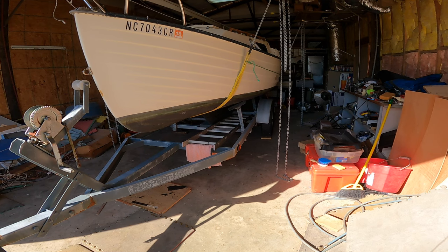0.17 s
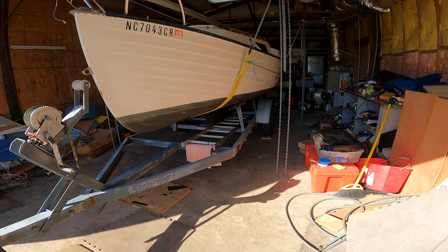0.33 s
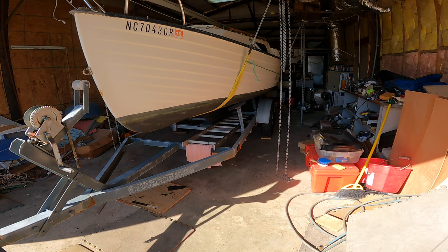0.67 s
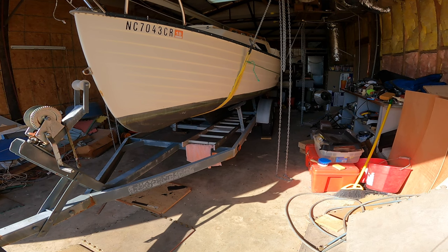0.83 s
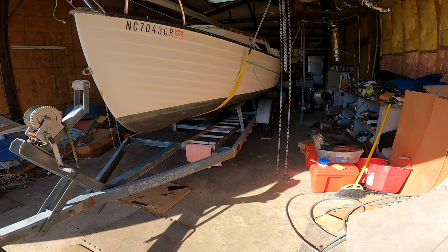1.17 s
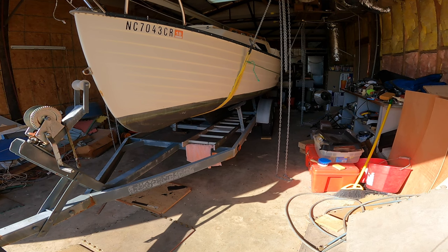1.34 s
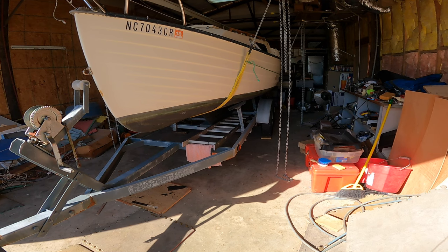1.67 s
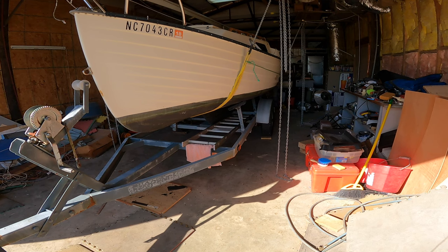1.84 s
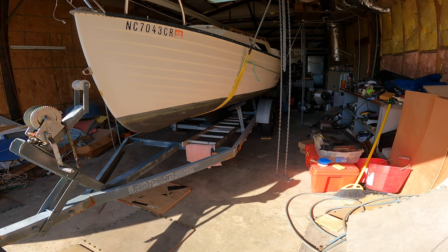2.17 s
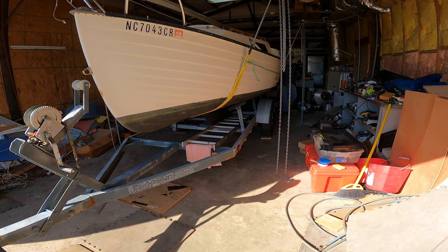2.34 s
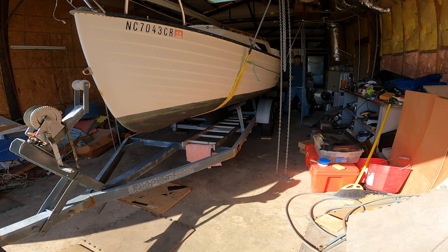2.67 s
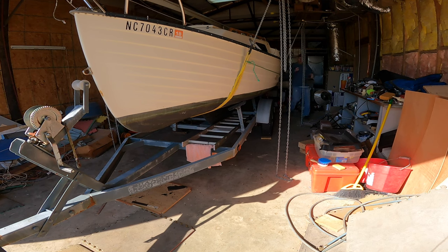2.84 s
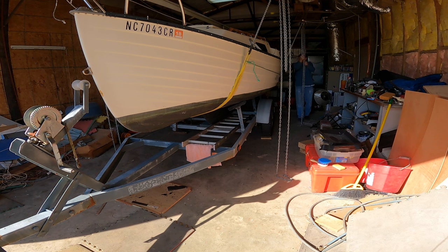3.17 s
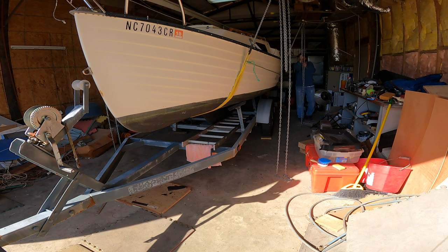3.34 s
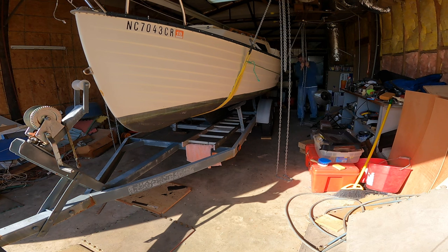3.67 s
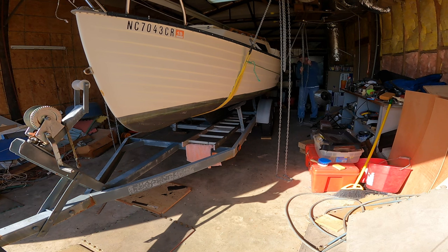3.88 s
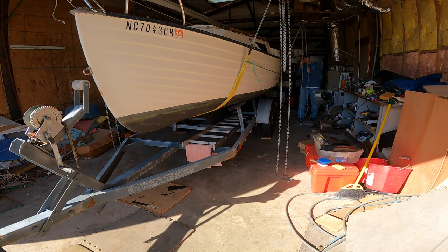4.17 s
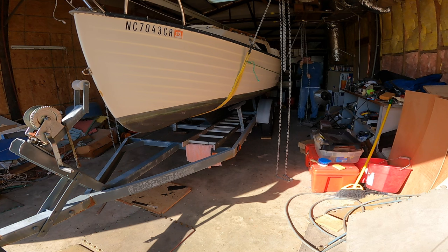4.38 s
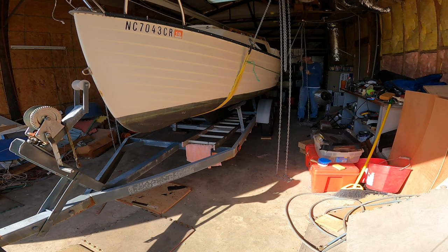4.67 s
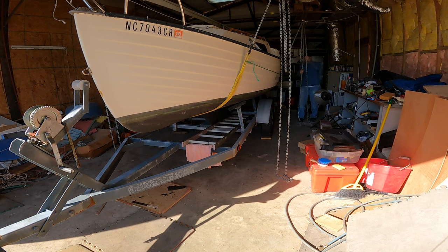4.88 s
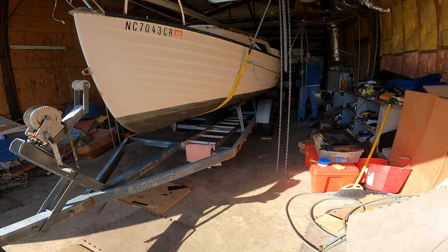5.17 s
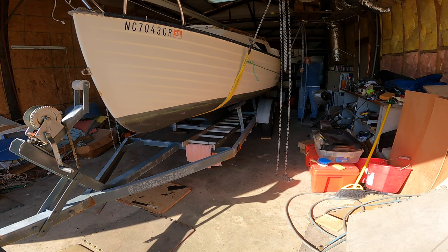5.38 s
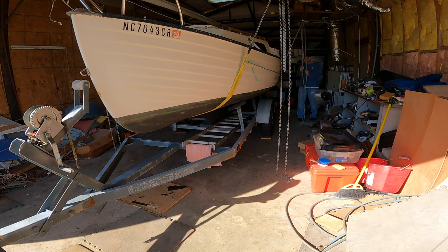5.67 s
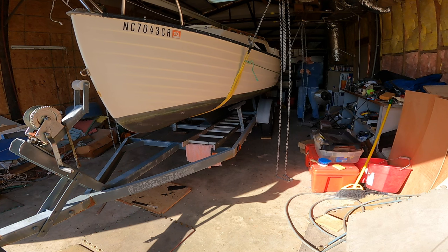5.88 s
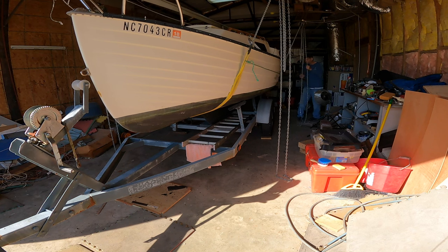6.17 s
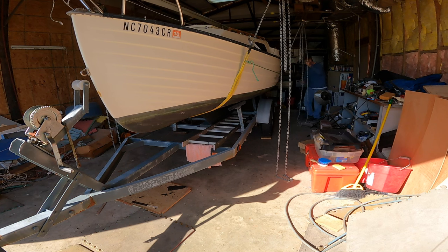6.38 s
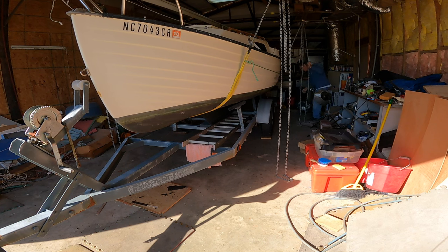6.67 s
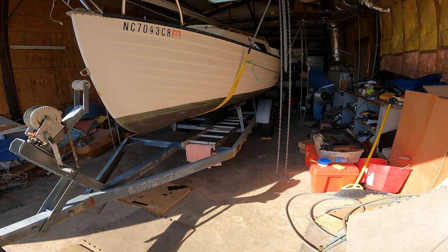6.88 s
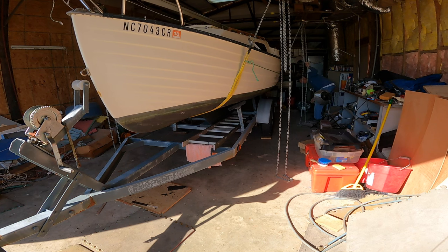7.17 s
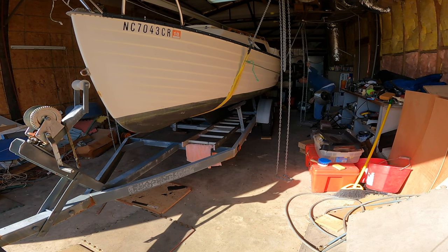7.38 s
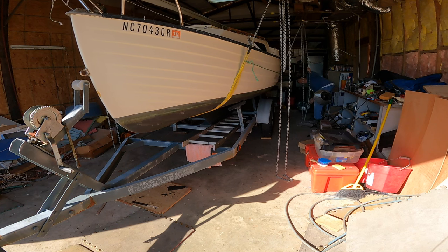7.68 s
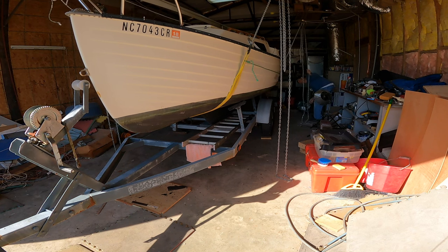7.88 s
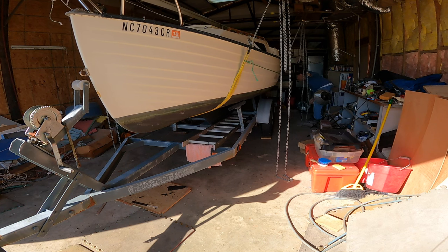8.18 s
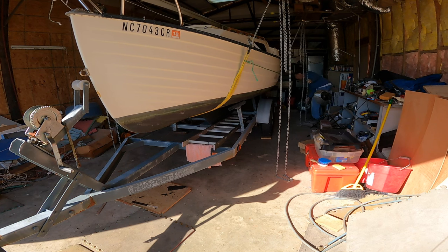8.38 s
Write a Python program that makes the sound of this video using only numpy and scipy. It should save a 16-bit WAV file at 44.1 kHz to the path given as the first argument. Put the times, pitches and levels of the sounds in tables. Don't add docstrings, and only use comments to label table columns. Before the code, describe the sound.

A fixed microphone hears a mostly quiet shed: distant motor hum, low air and faint traffic. Scattered gritty footsteps and a small clink come first. Then a chain hoist at the far end clatters in bursts, bright ratchet clicks over hollow metal knocks, with pawl clacks and dull low wooden booms after them. A pause of scuffs and dull wooden taps leads to a final brief rattle and a few last clicks.

```python
import sys
import numpy as np
from scipy import signal
from scipy.fft import rfft, irfft, next_fast_len
from scipy.io import wavfile
from scipy.ndimage import uniform_filter1d

SR = 44100
rng = np.random.default_rng(int(sys.argv[2]) if len(sys.argv) > 2 else 0)


def unload_audio(sound):
    columns = np.transpose(np.atleast_2d(sound))
    steps = np.round(np.clip(columns, -1, 1) * 32767)
    wavfile.write(sys.argv[1], SR, steps.astype(np.int16))


def magnitude_from_level(level_db):
    exponent = np.asarray(level_db, float) / 20
    return 10 ** exponent


N = 375732
TIME = np.arange(N) / SR

# (frequency [Hz], side minus mid [dB])
SHED_SIDE = [(100, -24), (260, -13.5), (500, -9.5), (1500, -6), (2500, -3), (5000, -5), (8000, -6.5),
             (12000, -22.5)]


def unit(x):
    return x / np.sqrt(np.mean(x ** 2))


def colour(x, points):
    hz, db = np.transpose(points)
    size = next_fast_len(len(x))
    bins_hz = np.arange(size // 2 + 1) * SR / size
    gain = magnitude_from_level(np.interp(np.log(bins_hz + 1), np.log(hz), db))
    return irfft(rfft(x, size) * gain, size)[:len(x)]


def ring(x, modes):
    out = 0
    for hz, width, db in modes:
        pole = np.exp((2j * np.pi * hz - np.pi * width) / SR)
        out = out + magnitude_from_level(db) * (1 - abs(pole)) * signal.lfilter([1], [1, -pole], x).imag
    return out


def band(x, low_hz, high_hz):
    return signal.sosfilt(signal.butter(2, [low_hz, high_hz], "band", fs=SR, output="sos"), x)


def smear(blows, length_s):
    return signal.lfilter([1], [1, -np.exp(-1 / (length_s * SR))], blows)


def walk(rate):
    k = int(SR / rate)
    held = np.repeat(rng.standard_normal(N // k + 1), k)
    return unit(uniform_filter1d(uniform_filter1d(held, k), k)[:N])


def place(out, s, sound):
    start = int(s * SR)
    room = out[..., start:start + sound.shape[-1]]
    room += sound[..., :room.shape[-1]]


def gains(tables, edge_s, shares):
    out = 0
    for table, share in zip(tables, shares):
        s, db = np.transpose(table)
        gate = np.clip(np.minimum(TIME - s[0], s[-1] - TIME) / edge_s, 0, 1)
        out = out + gate * magnitude_from_level(np.interp(TIME, s, db)) * magnitude_from_level(np.array([0, *share]))[:, None]
    return out


def swells(rows):
    roundness = 1.56
    coarse, power = TIME[::64], 0
    for s, db, rise, fall, *tied in rows:
        away = np.maximum((s - coarse) / max(rise, .005), (coarse - s) / max(fall, .005))
        level_db = db - 20 * away ** roundness + np.array([0, *tied])[:, None]
        power = power + magnitude_from_level(level_db) ** 2
    return np.array([np.interp(TIME, coarse, np.sqrt(p)) for p in power])


def clicks(rate, scatter_db, length_s):
    strength = magnitude_from_level(scatter_db * np.clip(rng.standard_normal(N), -2, 2))
    struck = (rng.random(N) < rate / SR) * strength
    return unit(smear(struck, length_s) * rng.standard_normal(N))


def hoist():
    # (time [s], link rattle [dB])
    pulls = [
        [(3.64, -23.5), (3.648, -25.5), (3.666, -34), (3.694, -22.5), (3.814, -22.5), (3.892, -27),
         (3.96, -75.5)],
        [(4.0, -61), (4.018, -29), (4.23, -24.5), (4.31, -27), (4.478, -25.5), (4.534, -30.5), (4.6, -62)],
        [(5.29, -30.5), (5.448, -23), (5.732, -24), (5.814, -34.5), (5.87, -54.5)],
        [(7.61, -41), (7.616, -26.5), (7.734, -26.5), (7.742, -22.5), (7.894, -29), (7.942, -62), (8.0, -43)],
    ]
    # (housing [dB], timber [dB], top [dB])
    pull_shakes = [(-8.5, -8.5, -35), (-4, -13, 2), (-5, -16, 1.5), (-4, -12.5, 1)]
    # (frequency [Hz], width [Hz], level [dB])
    link_rings = [(1980, 110, -5.5), (2247, 70, -3.5), (2347, 100, -1.5), (2777, 34, -2), (3073, 45, 2),
                  (3330, 60, -0.5), (3495, 49, 3.5), (3697, 70, 4), (4140, 63, 1), (4450, 57, 3.5),
                  (4640, 70, 1), (5100, 65, 2.5), (5960, 160, -0.5), (6700, 150, 0.5)]
    # (time [s], peak [dB], housing minus peak [dB], timber minus peak [dB], own ring [Hz])
    pawl_blows = [(3.6429, -14, -22.5, -39, 4060), (3.699, -15, -34, -13.5, 4600),
                  (4.0008, -20, -17, -44, 5440), (4.0178, -30.5, -3.5, -41, 3840),
                  (4.6098, -20.5, -7.5, -6.5, 4700), (4.975, -29.5, -17.5, -14, 3460),
                  (5.1629, -36, -11.5, -0.5, 4430), (5.2887, -14.5, -22.5, -31, 3340),
                  (5.362, -20.5, -8, -8.5, 3300), (5.9417, -19, -8.5, -11.5, 4700),
                  (5.957, -21, -24, -12, 2330), (7.6117, -18.5, -21, -37, 3240),
                  (7.625, -16.5, -33, -51, 3460), (7.661, -32, -0.5, -7, 4450), (8.064, -23, -7, -13, 4240),
                  (8.0755, -41.5, 2.5, 1.5, 2220), (8.235, -39, -9, -3.5, 4680)]

    pull = gains(pulls, 0.0027, pull_shakes)
    drive = pull[:3] * clicks(700, 1.8, 0.0033) * magnitude_from_level(np.array([[-4.], [-2.5], [-2.5]]))
    drive[1] *= magnitude_from_level(3.87 * walk(40) - 8.0)
    drive[1] += magnitude_from_level(-6.5) * band(drive[1], 694, 720) + magnitude_from_level(4.0) * band(drive[1], 1304, 1500)

    links = sum(ring(clicks(210, 2.2, .0015), [mode]) for mode in link_rings)
    jingle = unit(links) * pull[0] * magnitude_from_level(-3.5)
    jingle += unit(band(clicks(600, 6.3, 0.0074), 5500, 9300)) * pull[3] * magnitude_from_level(-5.0)
    jingle += ratchet()
    jingle += magnitude_from_level(-0.5) * band(drive[1], 320, 1850)

    age = np.arange(4096) / SR
    noises = rng.standard_normal((len(pawl_blows), 4096))
    for (s, db, housing_db, timber_db, hz), noise in zip(pawl_blows, noises):
        blow = noise * np.exp(-age / 0.0071)
        centred = magnitude_from_level(1.5) * blow + magnitude_from_level(1.0) * band(blow, 1200, 1900)
        levels = magnitude_from_level(db - 6.5 + np.array([0, housing_db + 5.5, timber_db + 13.0]))
        place(drive, s, levels[:, None] * np.array([blow, centred, blow]))
        dull_crack = magnitude_from_level(db + housing_db + 6.5) * band(blow, 280, 1600)
        first_click = magnitude_from_level(db - 15) * band(noise * np.exp(-age / .0012), 1500, 9000)
        knot = unit(band(noise, hz / 1.04, hz * 1.04)) * np.exp(-age / 0.011)
        own_ring = 0.67 * magnitude_from_level(db - 14 + 0.5 * (-22.0 - db)) * knot
        place(jingle, s, dull_crack + first_click + own_ring)
    return steel(drive), jingle


def steel(drive):
    # (frequency [Hz], density [dB per Hz])
    clack = [(820, -60), (1400, -4.5), (1990, -4.5), (2930, -1.5), (4750, 2), (5440, -1.5), (10200, -11.5),
             (12000, -23.5), (15600, -53.5), (22000, -120)]
    # (frequency [Hz], width [Hz], level [dB])
    housing = [(640, 60, -11), (694, 55, -3), (1200, 70, -11), (1269, 42, 0), (1380, 80, -8),
               (1950, 110, -11), (2225, 70, -8), (2780, 40, -7), (3070, 40, -8)]
    # (frequency [Hz], width [Hz], level [dB])
    timber = [(192, 120, -2.5), (257.4, 190, -9.5), (297, 26, 4.5), (318.5, 25, 6), (360, 37, -9.5),
              (450, 61, -16.5)]
    blow = np.zeros(SR // 2)
    blow[SR // 4] = 1
    out = 0
    for shape, points, push in zip((colour, ring, ring), (clack, housing, timber), drive):
        out = out + shape(push, points) / np.linalg.norm(shape(blow, points))
    return out


def ratchet():
    # (time [s], peak [dB])
    teeth = [
        [(3.6444, -36), (3.6763, -28), (3.6972, -17), (3.7372, -13), (3.7741, -13), (3.8145, -24.5),
         (3.8549, -26.5), (3.8758, -38)],
        [(4.0178, -14.5), (4.0487, -17), (4.0782, -14), (4.1051, -16), (4.1296, -13.5), (4.1779, -17),
         (4.2014, -16), (4.2962, -14.5), (4.3246, -15), (4.3516, -13.5), (4.3785, -20), (4.4084, -13),
         (4.4359, -20), (4.4593, -12.5), (4.4833, -18), (4.5177, -17)],
        [(5.3333, -13), (5.3607, -15.5), (5.4076, -23), (5.4625, -12.5), (5.4799, -17), (5.5119, -21.5),
         (5.6096, -12), (5.6855, -20), (5.7049, -20.5), (5.7738, -13.5)],
        [(7.6104, -28), (7.6582, -12.5), (7.6847, -14.5), (7.7136, -15.5), (7.7376, -14.5), (7.7615, -17),
         (7.8144, -15.5), (7.8443, -18.5), (7.8847, -14)],
    ]
    # (frequency [Hz], width [Hz], level [dB])
    tooth_rings = [(6960, 36, 4), (7350, 240, 5.5), (8700, 340, -7.5), (10200, 1300, -5.5)]
    blows = np.zeros(N)
    for run, offset_db in zip(teeth, (-18.5, -7, -8, -5.5)):
        s, db = np.transpose(run)
        blows[(s * SR).astype(int)] = magnitude_from_level(db + offset_db)
    crunch = smear(blows, 0.0059) * rng.standard_normal(N)
    unit_gain = np.std(ring(rng.standard_normal(SR), tooth_rings))
    return ring(crunch, tooth_rings) / unit_gain + magnitude_from_level(-7.5) * band(crunch, 3000, 8500)


def knocks():
    # (time [s], peak [dB])
    low_knocks = [(3.645, -36), (3.689, -45), (3.726, -27), (3.755, -27.5), (3.785, -28.5), (3.826, -42),
                  (3.872, -30), (4.026, -36), (4.069, -58), (4.135, -30.5), (4.186, -42), (4.247, -53),
                  (4.31, -29), (4.358, -30), (4.392, -27.5), (4.422, -45), (4.476, -33), (4.614, -39),
                  (4.641, -43), (5.168, -40), (5.299, -28), (5.364, -24), (5.44, -20.5), (5.506, -35.5),
                  (5.565, -27), (5.622, -19), (5.692, -28), (5.741, -45), (5.774, -35), (5.881, -43),
                  (5.956, -45), (7.612, -36), (7.661, -43), (7.697, -23), (7.761, -30), (7.827, -36),
                  (7.867, -37), (7.988, -48), (8.073, -33)]
    # (time [s], peak [dB])
    high_knocks = [(3.664, -29), (3.6964, -19), (3.7599, -47), (3.8272, -19), (3.86, -41), (4.04, -29),
                   (4.096, -39.5), (4.134, -26.5), (4.1807, -35), (4.2087, -45.5), (4.27, -29),
                   (4.3205, -29), (4.38, -25), (4.405, -31), (4.4362, -37.5), (4.467, -38.5), (4.522, -34),
                   (5.3088, -41.5), (5.3438, -42.5), (5.378, -32.5), (5.4294, -31.5), (5.4641, -26),
                   (5.499, -29), (5.5426, -23), (5.5657, -25), (5.6083, -25), (5.6294, -42.5),
                   (5.695, -39.5), (5.7744, -43), (7.661, -29), (7.681, -21), (7.7113, -31), (7.737, -27),
                   (7.797, -28), (7.8494, -47), (7.9129, -47), (7.9914, -36)]
    # (frequency [Hz], rise [s], decay [s], gain [dB])
    knock_tones = [(696, .004, .019, -3), (1269, .005, .024, -4.5)]
    # (time [s], peak [dB])
    ticks = [(4.844, -33), (4.9452, -42), (5.1167, -33), (6.201, -46), (6.281, -47), (6.352, -48),
             (6.4307, -36.5), (6.4827, -43), (6.7147, -43), (6.7631, -42), (6.787, -35), (6.822, -42),
             (7.1248, -49), (7.5834, -46.5)]
    out, age = np.zeros(N), np.arange(8192) / SR
    for table, (hz, rise, decay, gain_db) in zip((low_knocks, high_knocks), knock_tones):
        fade = (1 - np.exp(-age / rise)) * np.exp(-age / decay)
        for (s, db), (detune, turn) in zip(table, rng.standard_normal((len(table), 2))):
            tone = np.sin(2 * np.pi * hz * (1 + 0.011 * detune) * age + turn)
            tone += 0.48 * np.sin(2 * np.pi * hz * (1.06 + 0.014 * turn) * age)
            place(out, s, magnitude_from_level(db + gain_db) * tone * fade)
    for (s, db), noise in zip(ticks, rng.standard_normal((len(ticks), 8192))):
        place(out, s, magnitude_from_level(db - 6.5) * band(noise * np.exp(-age / 0.0053), 2800, 8500))
    return out


def pings():
    # (time [s], peak [dB], frequency [Hz], decay [s])
    ping_rows = [(1.185, -34.5, 2340, 0.025), (1.907, -47, 1100, 0.018), (1.93, -56, 4960, 0.025),
                 (2.165, -53, 4750, .012), (4.612, -34.5, 1316, 0.033), (5.165, -46.5, 4345, 0.017),
                 (0.2, -56, 2200, .02), (5.166, -51, 5900, .008), (1.19, -48, 3400, 0.018),
                 (1.195, -43, 4800, .012), (1.2, -40, 1200, 0.017), (1.21, -41, 2300, 0.023),
                 (4.64, -38, 321, 0.026), (5.955, -33, 302, 0.037), (1.19, -36.5, 1200, 0.013),
                 (4.625, -43.5, 2223, 0.031), (4.1, -48, 5975, .025), (4.63, -52, 4172, .03),
                 (4.976, -50, 6800, .012), (4.98, -54, 1970, .012), (4.615, -50, 4400, .03),
                 (5.7, -46, 500, .03), (4.62, -47, 3400, 0.041), (8.068, -46, 5400, .012),
                 (8.07, -48, 5561, 0.011), (8.069, -34.5, 1362, 0.011), (8.234, -49, 4300, 0.016),
                 (8.478, -44, 1550, 0.018)]
    out, age = np.zeros(N), np.arange(8192) / SR
    for s, db, hz, decay in ping_rows:
        cluster = 0
        for ratio, weight in ((1, 1), (1.03, 1.13), (.955, .6)):
            cluster = cluster + weight * np.sin(2 * np.pi * hz * ratio * age)
        place(out, s, magnitude_from_level(db) * cluster * np.exp(-age / max(decay, .003)))
    return out


def steps():
    # (time [s], peak [dB], loudest [Hz], bass minus peak [dB], contact length [s])
    heavy = [(0.191, -45, 2100, -28, 0.02), (0.287, -24, 3180, -14, 0.042), (0.5, -29, 1930, -17, 0.047),
             (0.782, -41.5, 1870, -6.5, 0.03), (1.892, -33, 1190, -13.5, 0.036),
             (2.313, -19, 1490, -3.5, 0.049), (2.403, -25.5, 910, -3, 0.017), (2.785, -43, 2000, -1, 0.023),
             (5.88, -37, 706, 1, 0.052), (8.182, -39, 3170, 0, 0.016), (8.474, -39, 1500, -1, 0.026)]
    # (time [s], peak [dB], loudest [Hz], treble minus peak [dB], contact length [s])
    gritty = [(0.004, -42.5, 1270, 1, 0.032), (0.428, -39, 1510, 2, 0.035), (0.542, -28.5, 1740, -9, 0.033),
              (0.597, -30, 3030, -4.5, 0.032), (1.176, -22.5, 2130, -9, 0.028),
              (1.573, -38.5, 1100, -5.5, 0.12), (1.703, -30.5, 2420, -12.5, 0.033),
              (2.032, -35.5, 1480, -9, 0.032), (2.131, -40, 940, -1, 0.017),
              (2.19, -52.5, 1620, 7.5, 0.022), (2.68, -54, 2100, 1, 0.069),
              (2.819, -50.5, 3730, -14, 0.034), (3.169, -37, 1770, -2.5, 0.055),
              (3.188, -24.5, 2140, -12, 0.025), (3.375, -37, 1230, -5, 0.028),
              (3.54, -33, 1520, 1.5, 0.082), (6.024, -32, 2150, -5.5, 0.026), (8.394, -45, 1410, 4, 0.017)]
    rows = [(s, db, hz, -50, bass, length) for s, db, hz, bass, length in heavy]
    for s, db, hz, treble, length in gritty:
        bass = -12.5 + 0.5 * (-37.0 - db)
        rows.append((s, db, hz, treble, bass, length))
    out, age = np.zeros(N), np.arange(8192) / SR
    noises = rng.standard_normal((len(rows), 4, 8192))
    for (s, db, hz, treble_db, bass_db, length), noise in zip(rows, noises):
        burst = unit(band(band(noise[0], hz / 1.73, hz * 3.47), hz / 4.9, hz * 1.53))
        burst += magnitude_from_level(-8.5) * unit(band(noise[3], hz / 1.097, hz * 1.06))
        burst += magnitude_from_level(treble_db + 0.5) * unit(band(noise[1], 2800, 6800))
        burst += magnitude_from_level(bass_db + 4) * unit(band(noise[2], 125, 1100))
        burst *= magnitude_from_level(2.3 * np.repeat(noise[2, :64], 128).clip(-2, 2))
        part = age / max(length, .003)
        load = np.exp(-part) * (1 - .8 * np.exp(-part / .4)) * np.minimum(age / .004, 1)
        place(out, s, magnitude_from_level(db - 5) * burst * load)
    return out


def edges():
    # (time [s], peak [dB], frequency [Hz])
    touches = [(0.195, -49, 2000), (0.286, -27.5, 1680), (0.504, -33, 1750), (1.174, -29, 2280),
               (1.576, -35.5, 890), (1.899, -33, 1050), (2.036, -42, 1370), (2.127, -33, 900),
               (2.316, -20.5, 694), (2.789, -41, 1670), (3.178, -37, 2070), (3.399, -34, 635),
               (6.269, -43, 554), (6.443, -35, 511), (8.184, -37, 650), (8.475, -41, 1600)]
    out, age = np.zeros(N), np.arange(4096) / SR
    for (s, db, hz), noise in zip(touches, rng.standard_normal((len(touches), 4096))):
        place(out, s, magnitude_from_level(db - 8.5) * unit(band(noise, hz / 2.03, hz * 1.4)) * np.exp(-age / 0.0079))
    return out


def scuffs():
    # (loudest [s], level [dB], rise [s], fall [s], treble minus level [dB])
    drags = [(0.314, -48, 0.27, 0.36, -11), (0.5, -72, 0.087, 0.6, -3), (0.7, -48, 0.36, 0.21, -55),
             (0.84, -57, .2, 0.07, -12), (1.1, -38.5, 0.049, 0.14, -8), (1.174, -33.5, 0.026, 0.084, -5),
             (1.23, -52, 0.066, 0.11, 11), (1.79, -55.5, .12, 1, -3.5), (2.3, -49, 0.85, 0.14, -9),
             (3.35, -55, 0.11, 0.25, -1.5), (3.63, -57, .06, .03, -14), (4.7, -35.5, 0.11, 0.034, -2),
             (4.95, -55.5, .5, 0.77, 2), (5.24, -47.5, 0.26, 0.24, 0), (6.17, -71, .2, 0.33, 6),
             (6.33, -47, 0.23, 0.081, -10), (6.48, -52.5, 0.61, 0.12, -2), (6.74, -52, 0.25, 0.12, -18),
             (6.845, -29, 0.089, 0.14, -15.5), (7.196, -50, 0.13, 0.088, -3.5),
             (7.31, -52.5, 0.07, 0.19, -24), (7.6, -45, 0.096, 0.05, -5.5), (8.24, -63, 0.077, 0.94, 9),
             (8.5, -50, 0.66, .1, -11)]
    body, treble = swells(drags) * magnitude_from_level(-9.0)
    crunch = unit(band(clicks(820, 9.5, 0.014), 800, 3530))
    fizz = unit(band(clicks(1100, 2.0, .003), 3700, 6950))
    return body * crunch + treble * fizz


def thuds():
    # (time [s], peak [dB], frequency [Hz], length [s])
    wood_knocks = [(0.539, -36, 470, 0.042), (1.713, -30, 573, 0.013), (2.129, -34, 226, 0.004),
                   (5.167, -40, 226, 0.029), (6.261, -29, 240, 0.015), (6.275, -26.5, 197, 0.0067),
                   (6.456, -37, 226, 0.016), (6.46, -36.5, 488, 0.012), (5.222, -35, 298, 0.02),
                   (3.18, -45.5, 295, 0.07), (7.578, -38, 230, 0.013)]
    out, age = np.zeros(N), np.arange(4096) / SR
    for (s, db, hz, length), noise in zip(wood_knocks, rng.standard_normal((len(wood_knocks), 4096))):
        hump = unit(band(noise, hz / 2.13, hz * 1.4))
        place(out, s, magnitude_from_level(db - 3.0) * hump * np.exp(-age / max(length, .003)))
    return out


def beam():
    # (loudest [s], beam [dB], rise [s], fall [s], floor boards minus beam [dB])
    jolts = [(0.02, -47.5, 0.27, 0.24, 4), (1.44, -50, 1, 0.061, -6), (1.71, -49, 0.3, 0.044, 0),
             (2.16, -51, 0.52, 0.17, 6), (2.49, -45.5, 0.062, 0.16, 8), (2.92, -51, 0.1, 1, 3.5),
             (3.41, -36.5, 0.11, 0.25, -1.5), (3.7, -28.5, 0.11, 0.33, -5), (3.8, -24, 0.13, 0.3, -4.5),
             (3.93, -30, .2, 0.12, -11), (4.08, -32.5, 0.027, 0.087, 2), (4.22, -33.5, 0.054, 0.15, -8),
             (4.53, -24, 0.18, 0.21, -17), (4.65, -20, 0.063, 0.14, -9), (4.9, -44, 0.29, 1, 0.5),
             (5.38, -38.5, 0.12, 0.29, -10), (5.6, -26, 0.19, 0.24, -4), (5.985, -22.5, 0.07, 0.12, -3.5),
             (6.35, -41.5, 0.41, 0.41, -1), (7.66, -31.5, 0.089, 0.2, -0.5), (7.9, -31.5, 0.53, 0.12, -7.5),
             (8.09, -27, 0.023, 0.19, -2)]
    # (loudest [s], deep rumble [dB], rise [s], fall [s])
    settling = [(2.35, -50, 0.12, .2), (3.8, -28.5, 0.15, 0.36), (4.01, -30.5, 0.09, 0.093),
                (4.32, -32.5, 0.32, 0.41), (4.82, -36, .2, 0.32), (5.5, -33, 0.44, 0.32),
                (5.77, -33, 0.26, 0.34), (6.0, -32, .2, 0.42), (7.9, -33, .4, 0.54), (8.3, -44, 0.33, 0.72)]
    # (beam [dB], boards [dB], rumble [dB])
    rest_db = (-67, -51, -55)
    moving = np.vstack([swells(jolts), swells(settling)])
    level, board, deep = np.hypot(moving, magnitude_from_level(np.array(rest_db))[:, None])
    out = magnitude_from_level(-4.5) * level * boom(83.2, 0.69)
    out += magnitude_from_level(-6.0) * board * boom(123, 0.99)
    return out + magnitude_from_level(-3.0) * deep * unit(band(rng.standard_normal(N), 8, 55))


def boom(hz, sway):
    shaking = 1 + sway * (walk(30) + 1j * walk(30))
    return unit((shaking * np.exp(2j * np.pi * hz * TIME)).real)


def hum():
    turn = 2 * np.pi * np.cumsum(226 + .8 * walk(4)) / SR
    return magnitude_from_level(-50 + 0.58 * walk(5.2)) * np.sin(turn)


def air():
    # (frequency [Hz], density [dB per Hz])
    low_air = [(12, -49), (20, -27.5), (59, -3), (114, -13), (160, -9), (270, -11), (320, -17.5),
               (441, -27), (576, -21), (720, -31), (1400, -43), (1820, -76.5), (3080, -120)]
    # (frequency [Hz], density [dB per Hz])
    traffic = [(700, -20.5), (1300, -11), (2000, -23), (4000, -33.5), (7000, -33.5), (10000, -47.5),
               (12000, -63)]
    layers = []
    for _ in range(2):
        low = unit(colour(rng.standard_normal(N), low_air))
        far = unit(colour(rng.standard_normal(N), traffic))
        layers.append(low + magnitude_from_level(-15.5 + 2.0 * walk(13.0)) * far)
    mid, side = layers
    return magnitude_from_level(-51 + 1.5 * walk(2.405)) * np.array([mid, colour(side, SHED_SIDE)])


def shed(x, wet_db):
    # (frequency [Hz], time to fall 60 dB [s])
    shed_t60 = [(100, 0.79), (500, 0.3), (2000, 0.29), (6000, 0.35), (12000, 0.24)]
    age = np.arange(SR // 2) / SR
    hz, t60 = np.transpose(shed_t60)
    tails = np.zeros((2, len(age)))
    for centre in 60 * 2 ** np.arange(0, 8, .5):
        fade = magnitude_from_level(-60 * age / np.interp(np.log(centre), np.log(hz), t60))
        tails += fade * band(rng.standard_normal((2, len(age))), centre / 1.262, centre * 1.19)
    tails *= np.minimum(age / 0.0064, 1)
    tails *= magnitude_from_level(wet_db) / np.linalg.norm(tails[0])
    tails[0, 0] += 1
    mid, side = (signal.fftconvolve(x, tail)[:N] / np.linalg.norm(tails[0]) for tail in tails)
    return np.array([mid, colour(side, SHED_SIDE)])


def scene():
    wheel, chain = hoist()
    floor = steps() + pings() + edges() + scuffs() + thuds()
    mid, side = (shed(wheel, wet_db=-2.0) + shed(chain, wet_db=-6.5) + shed(knocks(), wet_db=-4.0)
                 + shed(floor, wet_db=-8.5) + air())
    bass = beam()
    mid += bass + hum()
    side += magnitude_from_level(-34.5) * np.roll(bass, 900)
    side += colour(mid, [(200, -20), (350, -34.5), (600, -56.0)])
    return np.array([mid + side, mid - side])


def band_limit(x):
    return signal.sosfilt(signal.butter(12, 12900, fs=SR, output="sos"), x)


def record(dry):
    port = 0.44 * dry + 0.55 * signal.lfilter(*signal.iirnotch(11050, 10, fs=SR), dry)
    top_cut = signal.ellip(8, .3, 60, 11650, fs=SR, output="sos")
    return band_limit(signal.sosfilt(top_cut, port))


dry = scene()
out = record(dry)
unload_audio(out)
```